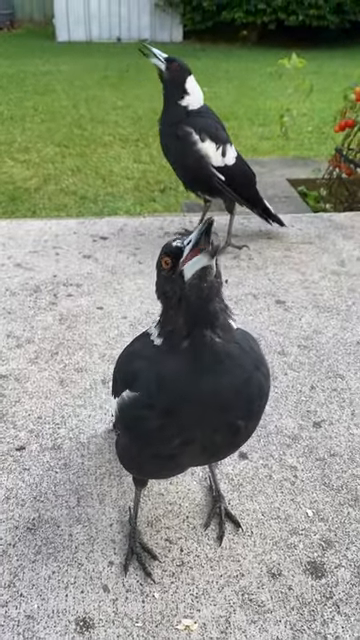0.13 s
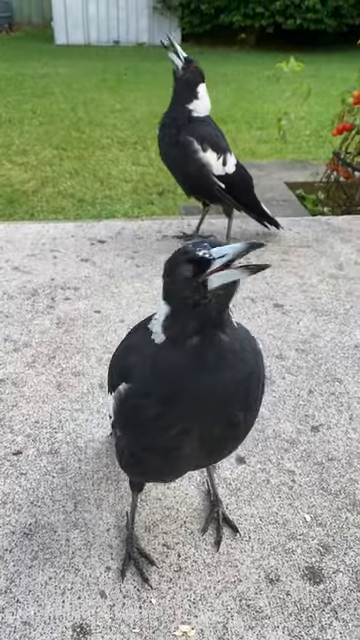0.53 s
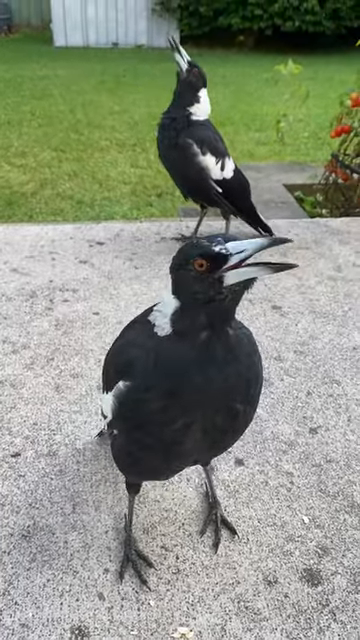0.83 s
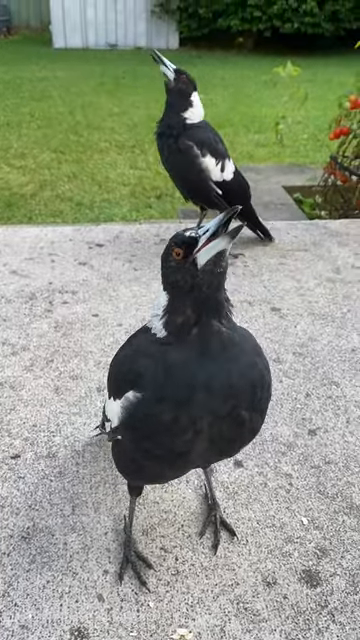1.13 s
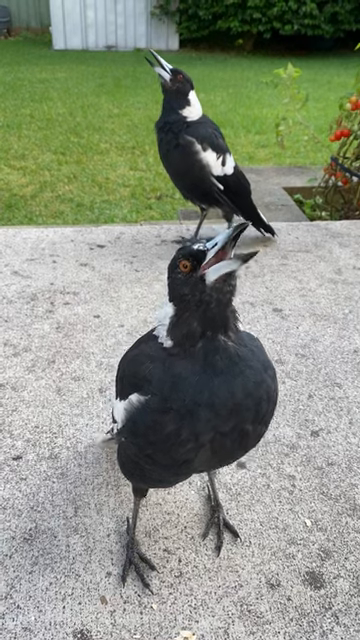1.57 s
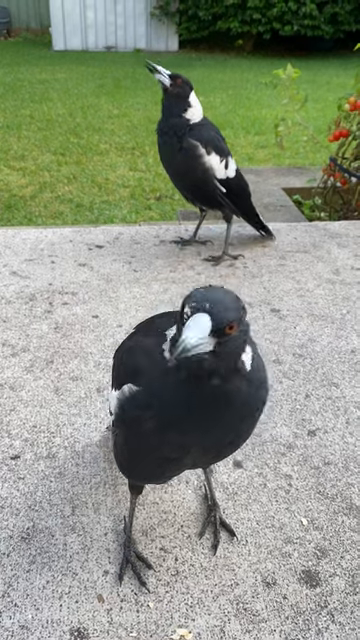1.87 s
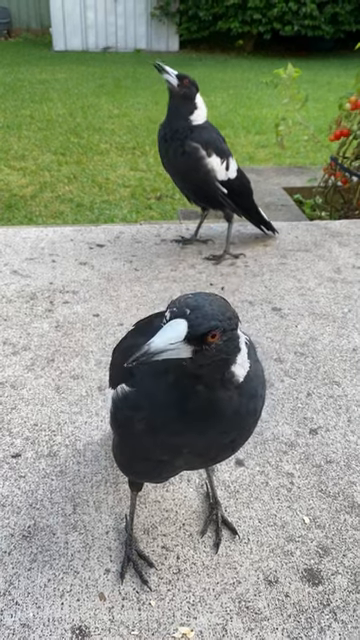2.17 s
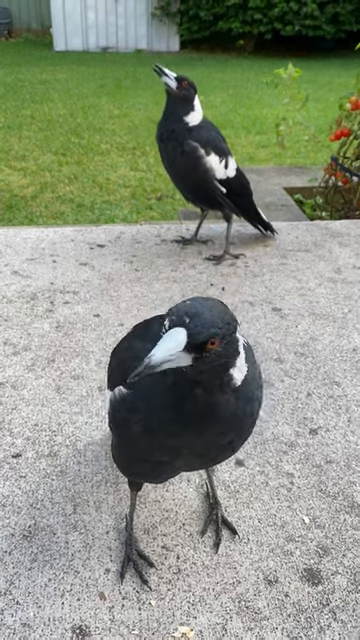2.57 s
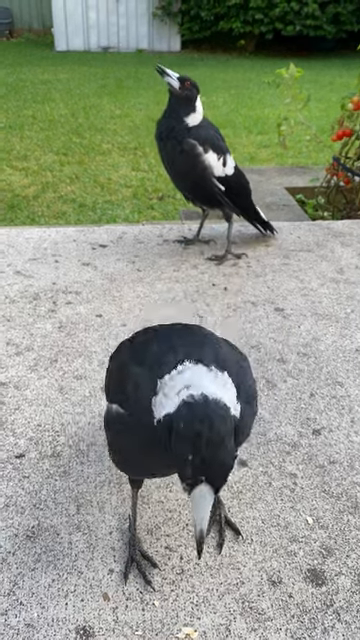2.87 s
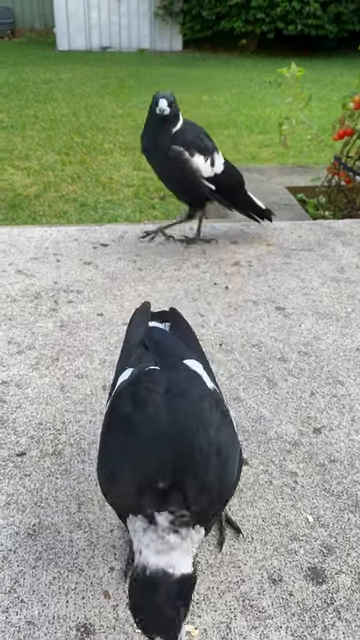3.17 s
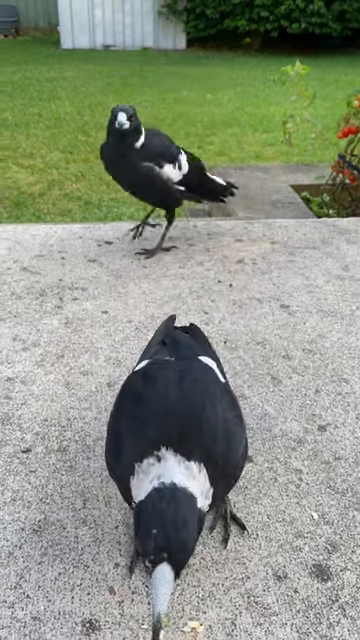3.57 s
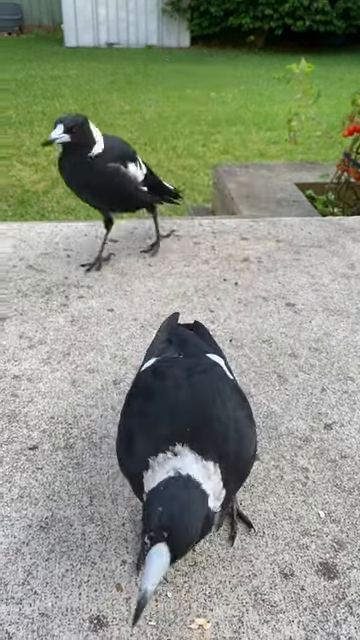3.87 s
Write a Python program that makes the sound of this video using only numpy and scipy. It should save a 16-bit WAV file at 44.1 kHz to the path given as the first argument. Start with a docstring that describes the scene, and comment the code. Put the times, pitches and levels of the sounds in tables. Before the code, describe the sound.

Two magpies carol close to the microphone on a patio: a loud trill, a downward slide, then a clashing two-toned call over a low growl; the second bird growls last, then two faint taps.

```python
"""Two magpies carol on a patio beside a lawn. The near one trills, slides down, then sings with both sides of its
syrinx at once, so that the two tones beat and mix; the other growls under it and has the last word.
Afterwards come two light taps on the concrete, over a distant traffic rumble. Trills are tones of swinging pitch,
overtones are harmonics and hiss with a set colour, taps and traffic are filtered noise."""
import sys
import numpy as np
from scipy import signal
from scipy.fft import rfft, irfft
from scipy.io import wavfile
from scipy.ndimage import uniform_filter1d

SR = 44100
rng = np.random.default_rng(int(sys.argv[2]) if len(sys.argv) > 2 else 0)


def store_pcm(level_fs):
    """Save levels as 16-bit WAV."""
    pcm = np.round(np.clip(level_fs, -1, 1) * 32767).astype(np.int16)
    wavfile.write(sys.argv[1], SR, np.atleast_2d(pcm).T)


N = 176400
T = np.arange(N) / SR
HZ = np.maximum(np.arange(N + 1) * SR / (2 * N), 1)
SIDES = np.array([[1], [-1]])  # left, right

# Colour of the near bird's overtones as heard, with dips near 7.7 and 13.2 kHz.
# Each row: frequency in Hz, level in dB.
NEAR_COLOUR = [(1700, -10.5), (2350, -10.5), (2800, -23), (3200, -13.5), (4600, -17), (5400, -17.5),
               (6800, -24), (7700, -56.5), (11000, -12), (12000, -18), (13200, -70), (15300, -11.5)]


def opening():
    """A loud, wide trill that slows and mellows."""
    # Each row: time in seconds, pitch in Hz, trills per second, tone level in dB, overtone level in dB.
    opening_path = [(0, 1133, 76, -14.5, -11.5), (0.11, 1084, 63.5, -19.5, -26),
                    (0.165, 1021, 53, -17, -32), (0.23, 998, 59, -13.5, -37)]
    hz, per_s, tone_db, overtone_db = in_time(opening_path)
    voice = trill(hz, per_s, swing=0.08, throb=0.45, jitter=0.018, uneven=0.008)
    overtones = amp(overtone_db) * open_beak(voice, breath=0.51)
    return gate(opening_path) * (tone(voice, tone_db) + overtones)


def slide():
    """A fast, narrow trill sinking through most of an octave; its third, then its fourth harmonic meets the ring."""
    # Each row: time in seconds, pitch in Hz, trills per second, tone level in dB, overtone level in dB.
    slide_path = [(0.29, 1432, 95, -29, -34.5), (0.45, 1256, 98, -20, -34.5), (0.52, 1202, 86, -16.5, -44),
                  (0.635, 1163, 85, -16, -41), (0.67, 1112, 82, -17, -28.5), (0.815, 1026, 98, -15.5, -36),
                  (0.84, 977, 131, -23, -36.5), (1.05, 824, 87, -32.5, -46.5)]
    hz, per_s, tone_db, overtone_db = in_time(slide_path)
    voice = trill(hz, per_s, swing=0.024, throb=0.53, jitter=0.013, uneven=0.06)
    overtones = amp(overtone_db) * open_beak(voice, breath=0.35)
    return gate(slide_path) * (tone(voice, tone_db) + overtones)


def carol():
    """Both sides of the syrinx sound; their sum beats and makes combination tones. The first note turns shrill."""
    # Each row: time in seconds, upper voice in Hz before the yodel is added, lower voice in Hz,
    # upper level in dB, lower level in dB, overtone level in dB.
    carol_path = [(0.975, 1400, 1165, -82, -20.5, -45.5), (1.0, 1400, 1145, -80.5, -8.5, -29.5),
                  (1.045, 1400, 1095, -78.5, -3.5, -29), (1.07, 1150, 1085, -52.5, -16.5, -25),
                  (1.079, 1400, 1075, -3, -17, -18.5), (1.09, 1420, 1070, -40, -8.5, -16),
                  (1.111, 1415, 1100, -17.5, -15.5, -35), (1.135, 1420, 1265, -16.5, -20, -29),
                  (1.26, 1370, 1275, -14.5, -17, -22), (1.36, 1265, 1125, -13.5, -7, -19),
                  (1.395, 1250, 1118, -19.5, -10, -15.5), (1.415, 1620, 1112, -23, -23.5, -30.5),
                  (1.485, 1620, 1115, -17.5, -18, -25), (1.503, 1430, 1120, -6, -31.5, -24.5),
                  (1.525, 1250, 1125, -12, -16.5, -20.5), (1.655, 1185, 1092, -16, -17.5, -22.5),
                  (1.685, 1410, 1100, -20.5, -26.5, -45.5), (1.768, 1390, 1135, -17.5, -36, -48.5)]
    yodel_start_s, yodel_end_s, yodel_per_s, yodel_hz = 1.415, 1.49, 62, 120.53
    beat_pull_hz = 35
    voice_evening = 0.36  # power law: in making overtones the two sides count almost alike
    shrill_s, shrill_half_s, shrill_db = 1.04, 0.026, -23

    upper_hz, lower_hz, upper_db, lower_db, overtone_db = in_time(carol_path)
    # The upper voice swings widely; the swing halts mid-cycle, leaving it about 97 Hz lower from there on.
    yodelling = (T > yodel_start_s) * (T < yodel_end_s)
    upper_hz = upper_hz + yodel_hz * np.sin(turn(yodel_per_s * yodelling))
    upper, lower = (spin(hz + hz * 0.0055 * drift(200)) for hz in (upper_hz, lower_hz))

    # Within each beat both pitches bend together, most when the voices are equally strong.
    a, b = amp(upper_db), amp(lower_db)
    pull_hz = beat_pull_hz * 2 * a * b / (a * a + b * b) * (upper / lower).imag
    duet = (a * upper + b * lower) * spin(pull_hz)

    a, b = a ** voice_evening, b ** voice_evening
    membranes = (a * upper + b * lower) / np.hypot(a, b)
    overtones = amp(overtone_db) * open_beak(membranes, breath=0.89)
    high_harmonics = sum(lower ** k for k in range(5, 15)).real
    shrill = evened(coloured(high_harmonics, NEAR_COLOUR))
    overtones = overtones + amp(shrill_db) * bell(shrill_s, shrill_half_s) * shrill
    return gate(carol_path) * (tone(duet, 0) + overtones)


def open_beak(swing, breath):
    """Overtones of the near bird: coloured claps, and one sharp ring that moves with the beak."""
    # Each row: time in seconds, ring frequency in Hz, odd overtones against even in dB.
    beak_path = [(0.2, 4700, -7.5), (0.3, 4100, 0), (0.46, 3863, -2), (0.66, 4480, 1), (0.9, 3963, -3.5),
                 (1.08, 4365, -4), (1.2, 4250, -2.5), (1.37, 4470, -4), (1.53, 4614, -14)]
    ring_db, ring_half_width_hz = 20.5, 180
    ring_hz, odd_db = in_time(beak_path)
    overtones = coloured(claps(swing, breath, odd_db), NEAR_COLOUR)
    # Shift the ring to 0 Hz, low-pass it there and shift it back.
    centre = spin(ring_hz)
    low_pass = signal.butter(1, ring_half_width_hz, fs=SR)
    ring = signal.lfilter(*low_pass, overtones / centre) * centre
    return evened(overtones + amp(ring_db) * ring.real)


def pips():
    """Brief, nearly pure notes that close the phrases."""
    # Each row: centre in seconds, half length in seconds, pitch in Hz, level in dB.
    pip_notes = [(1.82, 0.0081, 1374, -17.5), (2.349, 0.0059, 1103, -30.5)]
    total = 0
    for s, half_s, hz, db in pip_notes:
        note = reedy(spin(np.full(N, hz)), richness=0.036)
        total = total + bell(s, half_s) * tone(note, db)
    return total


def growls():
    """Low, rough flutters of the second bird with a buzzing top."""
    # One list per growl. Each row: time in seconds, pitch in Hz, tone level in dB, overtone level in dB.
    growl_paths = [
        [(0.26, 902, -32.5, -48), (0.32, 922.4, -24, -31.5), (0.56, 815.4, -59, -40.5),
         (0.98, 750.4, -36.5, -27.5)],
        [(1.84, 962, -40.5, -60.5), (1.91, 884, -27.5, -48.5), (2.22, 842, -32, -30), (2.33, 777.5, -45.5, -46)],
    ]
    # Colour of the growl's overtones as heard, with dips near 6.9 and 13.8 kHz.
    # Each row: frequency in Hz, level in dB.
    growl_colour = [(1750, -1.5), (2150, -28.5), (2550, -15.5), (3400, -14), (3750, -23.5), (4250, -1.5),
                    (4800, -30), (5600, -12), (6900, -53), (8100, -10), (9700, -1.5), (12500, -17),
                    (13800, -72)]
    total = 0
    for path in growl_paths:
        hz, tone_db, overtone_db = in_time(path)
        voice = flutter(hz, jitter=0.029, uneven=0.084)
        buzz = evened(coloured(claps(voice, breath=1.0, odd_db=-0.5), growl_colour))
        total = total + gate(path) * (tone(voice, tone_db) + amp(overtone_db) * buzz)
    return total


def grunt():
    """The growl sags into a low, pulsing grunt and leaves a thin tail."""
    # Each row: time in seconds, pitch in Hz, level in dB.
    grunt_path = [(2.375, 478.8, -43), (2.397, 763, -37.5), (2.412, 590, -43), (2.432, 760.5, -45),
                  (2.5, 763, -66)]
    hz, db = in_time(grunt_path)
    voice = flutter(hz, jitter=0.03, uneven=0.061)
    return gate(grunt_path) * tone(reedy(voice, richness=0.33), db)


def flutter(hz, jitter, uneven):
    """The second bird's rough trill, at 59 pulses per second."""
    return trill(hz, 59, swing=0.057, throb=0.44, jitter=jitter, uneven=uneven)


def trill(hz, per_s, swing, throb, jitter, uneven):
    """A tone whose pitch jumps up and sinks back on every trill, its strength with it; rms near 1."""
    # swing and jitter are shares of the pitch, uneven is a share of the trill rate
    beat = turn(per_s + per_s * uneven * drift(44))
    wave = np.cos(beat) - 0.55 * np.sin(2 * beat)
    strength = 1 + throb * np.cos(beat)
    return strength * spin(hz + hz * (swing * wave + jitter * drift(300)))


def claps(swing, breath, odd_db):
    """The membranes clap shut at wide swings: even and odd harmonics and a thin hiss."""
    hiss_from_hz, clap_power = 2100, 0.66
    angle = np.angle(swing)
    even = sum(np.cos(k * angle) for k in (2, 4, 6))
    odd = sum(np.cos(k * angle) for k in (3, 5, 7))
    high_pass = dull(hiss_from_hz) * HZ / hiss_from_hz
    hiss = filtered(rng.standard_normal(N), high_pass)
    return np.abs(swing) ** clap_power * (even + amp(odd_db) * odd + breath * hiss)


def coloured(x, colour):
    """Shape overtones by a table of levels over frequency, with no bass below 550 Hz."""
    db, = at_hz(colour)
    return filtered(x, amp(db) * (HZ > 550))


def reedy(swing, richness):
    """Add harmonics, each weaker than the last by the same share."""
    return swing / (1 - richness * np.exp(1j * np.angle(swing)))


def tone(swing, db):
    """The real part of a complex tone at a level; a steady tone of strength 1 gets that rms."""
    return np.sqrt(2) * amp(db) * swing.real


def taps():
    """Short dry scratches on the concrete: noise with a sudden onset and a quick decay."""
    # Contacts; the first two make one tap. Each row: start in seconds, level in dB.
    tap_hits = [(3.2116, -42.5), (3.2205, -42), (3.4265, -42.5)]
    dull_hz, decay_s = 8200, 0.0023
    level = sum(amp(db) * (T >= s) * np.exp(-np.abs(T - s) / decay_s) for s, db in tap_hits)
    scratch = unit(filtered(rng.standard_normal(N), dull(dull_hz)))
    return scratch * level


def placed(x):
    """Spread a sound over left and right by level and phase at each frequency."""
    # Each row: frequency in Hz, left against right in dB, left lead in radians.
    place_by_hz = [(920, -0.0, 0.56), (1080, -6.5, 0.01), (1250, -3.9, 1.2), (1420, 0.5, 0.47),
                   (4400, -2.1, 0.88)]
    balance_db, lead = at_hz(place_by_hz)
    ears = (amp(balance_db) * np.exp(1j * lead)) ** (SIDES / 2)
    # The sum of both sides keeps its level.
    return filtered(x, ears / np.abs(ears.mean(axis=0)))


def yard(x):
    """A faint, dull scatter from house and fence, different in each ear: decaying noise as echoes."""
    t60_s, level_db, dull_hz = 0.5, -11, 3020
    tails = [rng.standard_normal(N) * amp(-60 * T / t60_s) * (T > .005) for _ in SIDES]
    echoes = np.array([signal.fftconvolve(x, tail / np.linalg.norm(tail))[:N] for tail in tails])
    return amp(level_db) * filtered(echoes, dull(dull_hz))


def background():
    """Distant traffic, alike in both ears in the bass, and one wavering engine note."""
    # Colour of the traffic. Each row: frequency in Hz, relative level in dB per Hz.
    air_colour = [(92, -10), (200, -21), (516, -37), (2480, -44), (16000, -74)]
    # Engine note. Each row: time in seconds, level in dB.
    hum_path = [(2.9, -56), (3.05, -50)]
    air_level_db, hum_hz = -49.5, 85
    (air_db,), (hum_db,) = at_hz(air_colour), in_time(hum_path)
    colour = amp(air_db) / np.hypot(1, (46 / HZ) ** 5)  # little below 46 Hz
    side_colour = colour * .5 * HZ / np.hypot(HZ, 300)  # the ears differ less in the bass
    mid = filtered(rng.standard_normal(N), colour)
    side = filtered(rng.standard_normal(N), side_colour)
    traffic = amp(air_level_db) * (mid + side * SIDES) / mid.std()
    engine = tone(spin(hum_hz + 3 * drift(8.8)), hum_db)
    return traffic + engine


def amp(db):
    """Decibels to gain."""
    return 10 ** (np.asarray(db) / 20)


def unit(x):
    """Scale to rms 1."""
    return x / np.sqrt(np.mean(x ** 2) + 1e-20)


def evened(x):
    """Hold the rms level at 1 over a short sliding window."""
    return x / np.sqrt(np.abs(uniform_filter1d(x * x, size=700)) + 1e-12)


def in_time(rows):
    """Each column of a table as a curve over time."""
    s, *columns = np.transpose(rows)
    return [np.interp(T, s, c) for c in columns]


def at_hz(rows):
    """Each column of a table over log frequency."""
    hz, *columns = np.transpose(rows)
    return [np.interp(np.log(HZ), np.log(hz), c) for c in columns]


def gate(rows):
    """Open while a phrase lasts, with 8 ms fades outside it."""
    s, *_ = np.transpose(rows)
    return np.clip(1 + np.minimum(T - s.min(), s.max() - T) / .008, 0, 1)


def bell(s, half_s):
    """A brief swell around a moment."""
    return np.exp(-np.square((T - s) / half_s))


def filtered(x, response):
    """Apply a frequency response."""
    return irfft(rfft(x, 2 * N) * response)[..., :N]


def dull(hz):
    """Response of a gentle low-pass."""
    return hz / np.hypot(hz, HZ)


def drift(rate_hz):
    """Random wander, spread 1."""
    return unit(filtered(rng.standard_normal(N), np.square(dull(rate_hz))))


def turn(hz):
    """Running phase of a frequency."""
    return 2 * np.pi * np.cumsum(hz) / SR


def spin(hz):
    """A complex tone that follows a frequency."""
    return np.exp(1j * turn(hz))


def scene():
    """Both birds and the taps, placed in the yard, over the traffic."""
    near_bird = opening() + slide() + carol()
    second_bird = growls() + grunt()
    foreground = near_bird + second_bird + pips() + taps()
    return placed(foreground) + yard(foreground) + background()


def record(dry):
    """The loudest notes overload; the top is cut."""
    cutoff_hz = 15900
    return filtered(np.clip(dry, -1, 1), 1 / (1 + (HZ / cutoff_hz) ** 120))


dry = scene()
out = record(dry)
store_pcm(out)
```